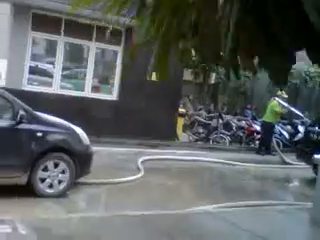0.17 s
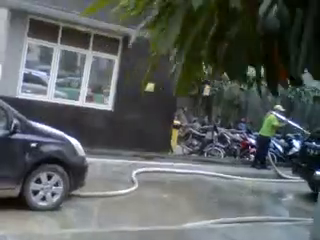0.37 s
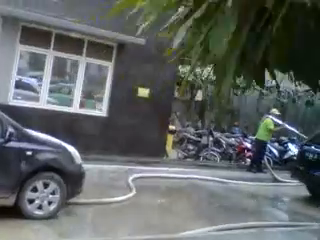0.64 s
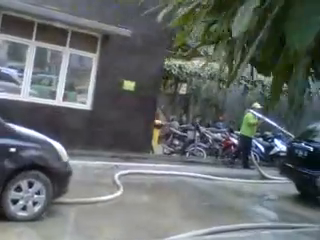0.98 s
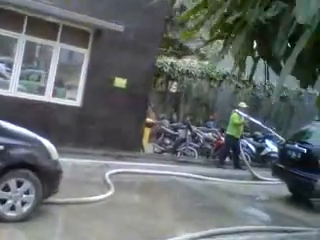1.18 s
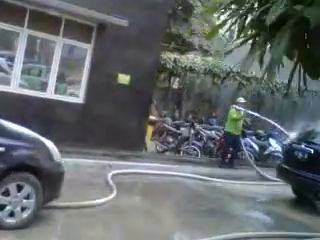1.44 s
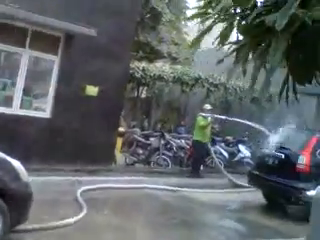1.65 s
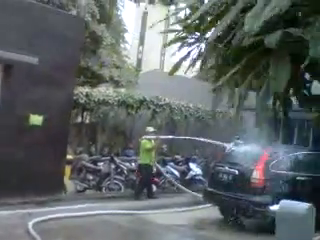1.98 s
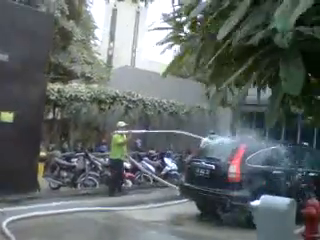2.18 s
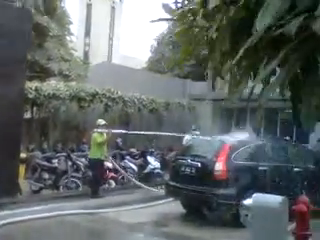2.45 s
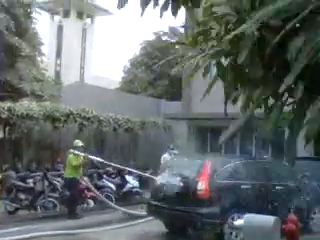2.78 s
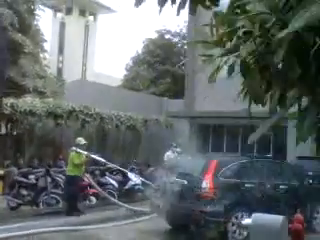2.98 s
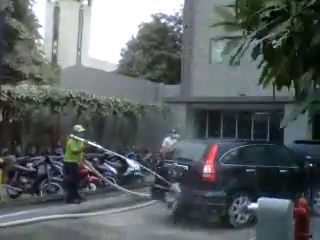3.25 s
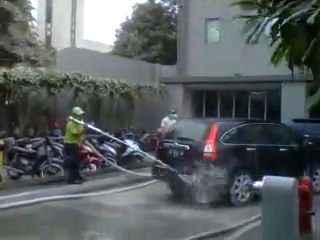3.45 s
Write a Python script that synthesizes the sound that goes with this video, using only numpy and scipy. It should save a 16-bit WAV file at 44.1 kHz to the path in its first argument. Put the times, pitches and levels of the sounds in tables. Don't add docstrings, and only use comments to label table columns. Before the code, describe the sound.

Hissing water from a strong hose strikes a car across a yard, with drops slapping the panels and low engine rumble behind. It grows in steps and ends loudest, heard through a cheap, muffled camera microphone.

```python
import sys
import numpy as np
from scipy import signal
from scipy.fft import rfft, irfft
from scipy.io import wavfile
from scipy.ndimage import uniform_filter1d, minimum_filter1d

SR = 44100
rng = np.random.default_rng(int(sys.argv[2]) if len(sys.argv) > 2 else 0)


def voltage_ratio(decibels):
    exponent = np.asarray(decibels, float) / 20
    return 10 ** exponent


def dump(signal):
    limited = np.clip(np.atleast_2d(signal).T, -1, 1)
    pcm = np.round(limited * 32767).astype(np.int16)
    wavfile.write(sys.argv[1], SR, pcm)


N = 159642
T = np.arange(N) / SR
SPLIT_HZ = 4000
EDGE_HZ, IMAGE_TOP_HZ = 7260, 9200
INNER_RATE_HZ = 16000
MEAN_JET_DB, MEAN_SQUARE_DB, SQUARE_ON_S = -36, -11, 3.1


def evened(x):
    return x / np.sqrt(np.mean(x ** 2) + 1e-20)


def coloured(x, points, lo_hz, hi_hz):
    hz = np.fft.rfftfreq(N, 1 / SR)
    point_hz, point_db = np.transpose(points)
    gain = voltage_ratio(np.interp(np.log(hz + 1), np.log(point_hz + 1), point_db))
    gain = gain * (hz > lo_hz) * (hz < hi_hz)
    return evened(irfft(rfft(x) * gain, N))


def patchy(patch_db, flicker_db, bins, size):
    frames = N // 64 + 6
    real, imag, patch = rng.standard_normal((frames, 129, 3)).T
    patch = uniform_filter1d(patch, bins, axis=0)
    patch = evened(uniform_filter1d(patch, size, axis=1))
    flicker = uniform_filter1d(rng.standard_normal(frames), size=9)
    flicker = evened(uniform_filter1d(flicker, size=9))
    z = (real + 1j * imag) * voltage_ratio(patch_db * patch + flicker_db * flicker)
    return evened(signal.istft(z, nperseg=256, noverlap=192)[1][:N])


def drops():
    drops_per_s, spread_db = 5000, 4
    sign, size, chance = rng.random((N, 3)).T
    clicks = np.sign(sign - .5) * voltage_ratio(-spread_db * np.log(size + 1e-3))
    return evened(clicks * (chance < drops_per_s / SR))


def resonate(x, hz, width_hz):
    turn = np.exp(2j * np.pi * np.cumsum(hz) / SR)
    r = np.exp(-np.pi * width_hz / SR)
    return 2 * (turn * signal.lfilter([1 - r], [1, -r], x / turn)).real


def jet():
    # time in seconds, spray level in dB, squareness of the blow in dB.
    jet_path = [(0.0, -42.5, -12), (0.41, -42.5, -7.5), (0.53, -41.5, -13.5), (1.1, -43.5, -6.5),
                (1.18, -39, -12.5), (1.23, -33.5, -12), (1.25, -34, -12.5), (1.32, -37.5, -9),
                (1.69, -34, -19), (1.72, -35, -7), (1.73, -35, -10.5), (1.9, -36.5, -11),
                (2.68, -33.5, -13.5), (2.99, -30.5, -10), (3.0, -28.5, -8), (3.07, -32.5, -4),
                (3.47, -31, -4), (3.62, -31.5, -1)]
    time, level_db, square_db = np.transpose(jet_path)
    return np.interp(T, time, level_db), np.interp(T, time, square_db)


def spray():
    # pitch in Hz, level in dB per Hz.
    spray_colour = [(2410, -25), (4100, -0.5), (4270, 0), (5240, 0.5), (5960, -3), (6550, -2.5), (7200, -9),
                    (9360, -40.5), (15800, -120)]
    fizz = patchy(patch_db=1.17, flicker_db=0.97, bins=5, size=24) + .3 * drops()
    level_db, _ = jet()
    return voltage_ratio(level_db) * coloured(fizz, spray_colour, SPLIT_HZ, SR / 2)


def panels():
    # pitch in Hz, level in dB per Hz.
    panel_colour = [(150, -38.5), (250, -4), (365, -3), (1570, -4.5), (1960, -12.5), (2220, -1),
                    (2640, -10.5), (3210, -3), (3900, -5), (5070, -35), (8580, -120)]
    drop_share = 0.33
    water = patchy(patch_db=0.86, flicker_db=1.0, bins=2, size=40)
    drum = drop_share * drops() + (1 - drop_share) * water
    level_db, square_db = jet()
    drum_db = -14 + level_db + 1.426 * (square_db - MEAN_SQUARE_DB)
    return voltage_ratio(drum_db) * coloured(drum, panel_colour, 150, SPLIT_HZ)


def wash():
    # pitch in Hz, level in dB per Hz.
    wash_colour = [(150, -30), (250, -4.5), (410, -8), (546, -6), (634, -7), (1210, -4.5), (2730, -17),
                   (3210, -11), (3900, -9), (5070, -46.5), (8580, -120)]
    water = patchy(patch_db=2.06, flicker_db=0.87, bins=2, size=50)
    slow_db = uniform_filter1d(jet()[0], size=9000)
    wash_db = -44 + 0.77 * (slow_db - MEAN_JET_DB)
    return voltage_ratio(wash_db) * coloured(water, wash_colour, 300, SPLIT_HZ)


def pump():
    # pitch in Hz, level in dB per Hz.
    pump_colour = [(8.8, -39), (15, -9.5), (32, 0.5), (70, -2), (125, 0), (224, -5.5), (251, -8),
                   (360, -15), (420, -14), (550, -41), (920, -120)]
    # pitch in Hz, width in Hz, level in dB.
    shaft_tones = [(44.4, 4.8, -52), (105.7, 26, -52.5), (131.8, 16., -53.5), (354, 30., -59.5)]
    rumble = patchy(patch_db=2.46, flicker_db=0.9, bins=1, size=60)
    out = voltage_ratio(-42.5) * coloured(rumble, pump_colour, 8, 420)
    for hz, width_hz, db in shaft_tones:
        tone = resonate(rng.standard_normal(N), np.full(N, hz), width_hz)
        out = out + voltage_ratio(db) * evened(tone)
    swell_db = 0.62 * (uniform_filter1d(jet()[0], size=15000) - MEAN_JET_DB)
    return voltage_ratio(swell_db) * out


def hollows():
    # start in seconds, length in seconds, pitch in Hz, width in Hz, level in dB.
    hollow_tones = [(0.099, 0.21, 980, 110, -57), (0.59, .48, 980, 98, -51.5),
                    (1.17, .15, 4380, 1770, -34.5), (1.23, 0.31, 1350, 280, -45.5),
                    (1.334, .2, 696, 280, -46.5), (1.949, 0.17, 1010, 160, -50.5),
                    (2.2, 0.39, 1350, 400, -49.5), (2.99, .25, 1110, 300, -38.5),
                    (3.1, .15, 1410, 300, -38), (3.17, 0.41, 3180, 380, -39), (3.378, 0.2, 2280, 220, -39),
                    (3.25, 0.23, 1730, 400, -40), (2.6, .25, 1640, 180, -53), (.55, 0.65, 1556, 220, -55),
                    (.18, 0.19, 107, 47, -44.5), (2.08, .3, 120, 120, -46.5), (3.08, 0.44, 93, 120, -39.5),
                    (1.3, 0.24, 245, 180, -48), (1.44, .1, 4900, 3000, -37), (1.57, .12, 5900, 3000, -37.5),
                    (1.8, 0.55, 44, 12, -51), (2.3, .25, 400, 160, -52)]
    glide, edge_s, flutter_db = 0.022, 0.047, 1.54
    out = np.zeros(N + SR)
    for start, length, hz, width_hz, db in hollow_tones:
        u = np.linspace(0, 1, round(length * SR))
        noise = rng.standard_normal((2, SR))[:, :len(u)]
        pitch = hz * (1 + glide * (2 * u - 1))
        tone = resonate(noise[0], pitch, width_hz)
        tone = evened(resonate(tone, pitch, width_hz))
        flutter = uniform_filter1d(uniform_filter1d(noise[1], size=400), size=400)
        flutter = flutter_db * evened(flutter)
        to_edge_s = np.minimum(u, 1 - u) * length
        fade = np.sin(np.pi / 2 * np.clip(to_edge_s / edge_s, 0, 1)) ** 2
        out[round(start * SR):][:len(u)] += voltage_ratio(db + flutter) * fade * tone
    return out[:N]


def slaps():
    # time in seconds, peak level in dB, pitch in Hz, length in cycles.
    big_drops = [(0.7814, -24.5, 725, .48), (0.782, -36, 1550, 1.2), (1.066, -39, 2170, 3.),
                 (1.353, -30, 950, 0.68), (1.471, -29.5, 1350, 1.4), (1.718, -23.5, 1290, 1.07),
                 (1.719, -29, 3290, 2.5), (2.079, -31, 1140, .8), (3.129, -25, 1163, 2.2),
                 (3.168, -24, 1460, 2.5), (3.001, -28, 4900, 4.)]
    splash_db, splash_s = -18, .005
    out, t = np.zeros(N), T[:SR // 50]
    for start, db, hz, cycles in big_drops:
        u = t * hz - 2 * cycles
        blow = np.sin(2 * np.pi * u) * np.exp(-(u / cycles) ** 2)
        splash = resonate(rng.standard_normal(len(t)), np.full(len(t), 1.3 * hz), .4 * hz)
        splash = voltage_ratio(splash_db) * np.exp(-t / splash_s) * evened(splash)
        out[round(start * SR):][:len(t)] += voltage_ratio(db) * (blow + splash)
    return out


def slots(x):
    slot_db, hole_db = 2.1, -35
    hole_rarity, hole_hz, hole_width_hz = 2.55, 2800, 1100
    hz, t, z = signal.stft(x, SR, nperseg=4096, noverlap=3072)
    low = hz < SPLIT_HZ
    uneven, chance = rng.standard_normal((len(t), low.sum(), 2)).T
    uneven = uniform_filter1d(uneven, size=2, axis=0)
    uneven = evened(uniform_filter1d(uneven, size=6, axis=1))
    rarity = hole_rarity + ((hz[low, None] - hole_hz) / hole_width_hz) ** 2
    rarity = rarity + 10 * (t > SQUARE_ON_S)
    whole = minimum_filter1d(1. * (chance < rarity), size=4, axis=0)
    whole = minimum_filter1d(whole, size=6, axis=1)
    gain = np.ones(z.shape)
    gain[low] = voltage_ratio(slot_db * uneven + hole_db * (1 - whole))
    return signal.istft(z * gain, SR, nperseg=4096, noverlap=3072)[1][:N]


def two_bands(x):
    hz = np.fft.rfftfreq(N, 1 / SR)
    notch = np.clip(abs(hz - SPLIT_HZ) / 60, .01, 1)
    edge = voltage_ratio(np.clip(-0.3976 * (hz - EDGE_HZ), -120, 0))
    return irfft(rfft(x) * notch * edge, N)


def mirror_image(x):
    hz = np.fft.rfftfreq(N, 1 / SR)
    folded = rfft(2 * x * np.cos(2 * np.pi * INNER_RATE_HZ * T))
    folded = folded * (hz > SPLIT_HZ * 2) * (hz < IMAGE_TOP_HZ)
    image_db = -26.5 - .04 * np.maximum(hz - (INNER_RATE_HZ - EDGE_HZ), 0)
    return irfft(folded * voltage_ratio(image_db), N)


def blips():
    # start in seconds, peak level in dB.
    edge_blips = [(0.7794, -59.5), (0.8447, -54), (1.0999, -60), (1.1638, -69), (1.2276, -56),
                  (1.291, -45.5), (1.5475, -56), (1.6117, -47.5), (1.6748, -49.5), (1.74, -41.5),
                  (2.124, -47.5), (3.021, -46)]
    out, t = np.zeros(N), T[:round(0.01 * SR)]
    whistle = np.hanning(len(t)) * np.sin(np.pi * INNER_RATE_HZ * t)
    for start, db in edge_blips:
        out[round(start * SR):][:len(t)] += voltage_ratio(db + 2) * whistle
    return out


def scene():
    mix = spray() + panels() + wash() + pump() + hollows() + slaps()
    return np.tile(mix, (2, 1))


def low_pass(x):
    return signal.sosfilt(signal.butter(12, 9200, fs=SR, output="sos"), x)


def record(dry):
    x = two_bands(slots(dry[0]))
    x = x + mirror_image(x) + blips()
    return low_pass(np.tile(x, (2, 1)))


dry = scene()
out = record(dry)
dump(out)
```